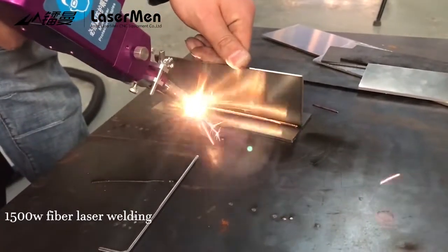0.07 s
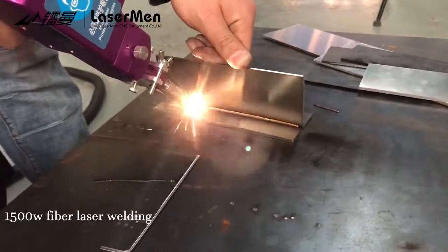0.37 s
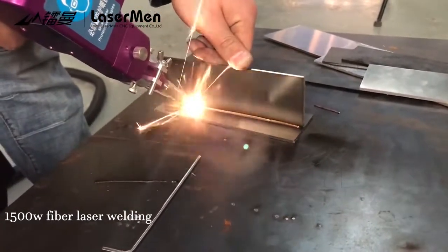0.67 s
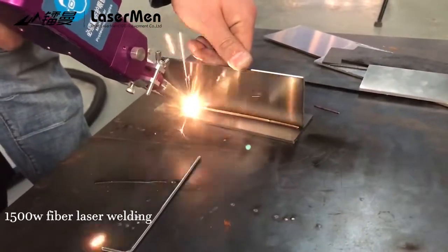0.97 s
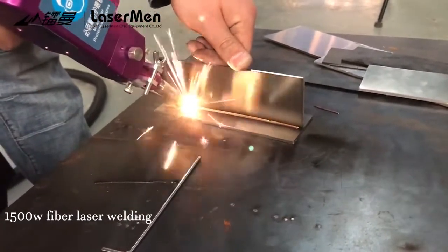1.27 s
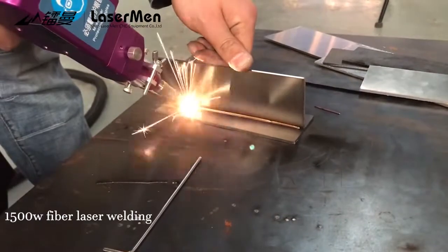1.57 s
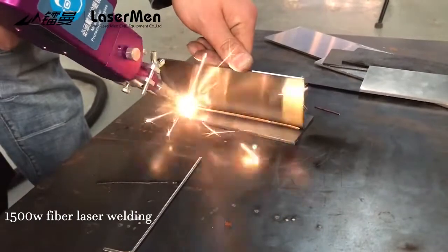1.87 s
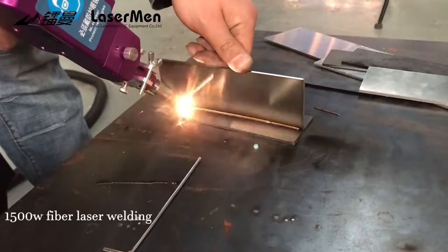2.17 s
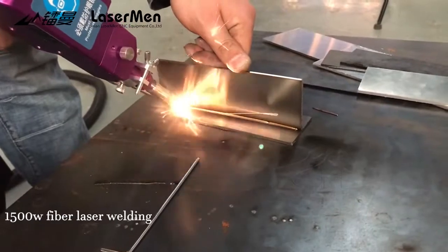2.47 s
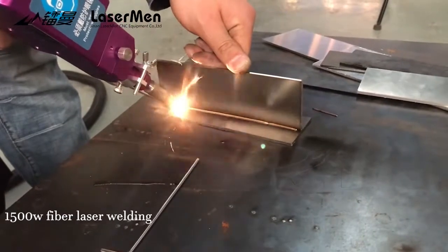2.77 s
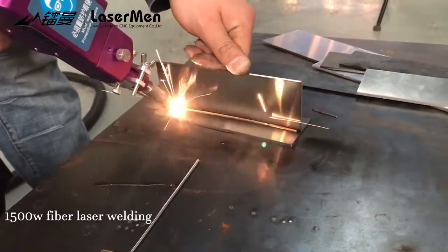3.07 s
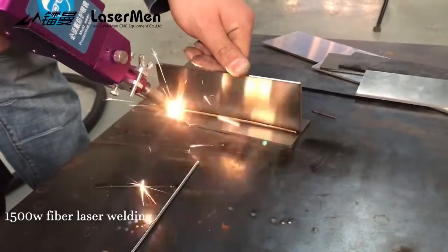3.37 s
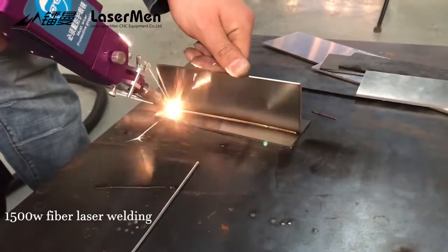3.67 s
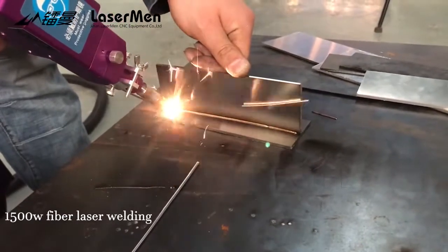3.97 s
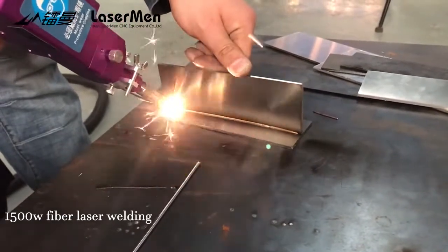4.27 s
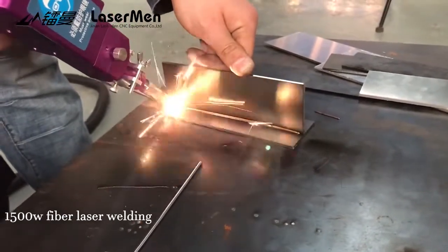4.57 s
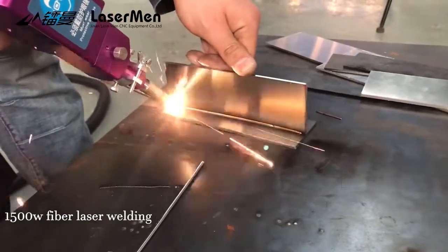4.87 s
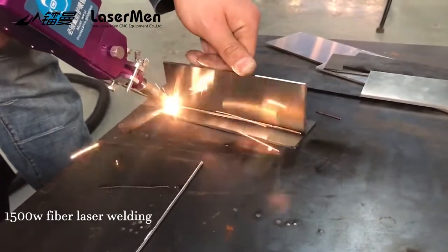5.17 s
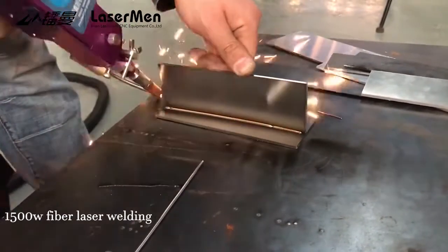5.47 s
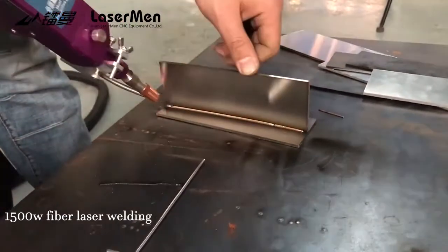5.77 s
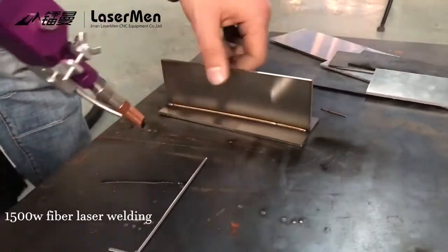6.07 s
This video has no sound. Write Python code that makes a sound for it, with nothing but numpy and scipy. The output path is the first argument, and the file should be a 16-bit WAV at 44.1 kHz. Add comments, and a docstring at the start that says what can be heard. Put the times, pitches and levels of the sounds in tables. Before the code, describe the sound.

A laser welder sizzles and crackles steadily on steel, then stops, leaving a weaker gas hiss and a light metal scrape.

```python
"""Handheld laser welding on a workbench

A laser welder runs along the corner of two steel sheets, close up. The melt sizzles and surges with
each push of the filler wire, over shielding gas hissing through the nozzle. The beam stops, the melt
spits a few more times, the gas shuts off and the piece is nudged across the bench; machines hum."""
import sys
import numpy as np
from scipy import signal
from scipy.fft import rfft, irfft
from scipy.io import wavfile
from scipy.ndimage import uniform_filter1d

SR = 44100
rng = np.random.default_rng(int(sys.argv[2]) if len(sys.argv) > 2 else 0)


def persist_wave(psi):
    """Save psi, clipped to +-1, as 16-bit WAV."""
    counts = np.round(np.clip(psi, -1, 1) * 32767).astype(np.int16)
    wavfile.write(sys.argv[1], SR, np.atleast_2d(counts).T)


N = 278712
TIME = np.arange(N) / SR
FREQ = np.maximum(np.arange(N // 2 + 1) * SR / N, 1)
FEED_HZ = 9.757  # pushes of the filler wire
BEAM_OFF_S = 5.283


def from_db(db):
    """Decibels to gain."""
    return 10 ** (np.asarray(db) / 20)


def rms_one(x):
    """Scale to an rms of 1."""
    return x / np.sqrt(np.mean(x ** 2) + 1e-20)


def spectrum(points):
    """EQ curve through (frequency [Hz], gain [dB]) points."""
    hz, db = np.transpose(points)
    return from_db(np.interp(np.log(FREQ), np.log(hz), db))


def resonances(modes):
    """EQ curve of steep-sided peaks, each (frequency [Hz], width [Hz], gain [dB])."""
    peaks = (from_db(db) / (1 + ((FREQ ** 2 - hz ** 2) / (FREQ * width)) ** 2)
             for hz, width, db in modes)
    return np.sqrt(sum(peak ** 2 for peak in peaks))


def shaped(x, gain):
    """Filter by an EQ curve; rms 1."""
    return rms_one(irfft(rfft(x) * gain, N))


def noise():
    """White noise."""
    return rng.standard_normal(N)


def drift(rate_hz):
    """Smooth random wander; rms 1."""
    return shaped(noise(), 1 / (1 + (FREQ / rate_hz) ** 2))


def grains(per_s, spread_db):
    """Random clicks of uneven size and sign; rms 1."""
    sizes = from_db(spread_db * np.minimum(rng.exponential(1, N), 4))
    signs = rng.choice([-1, 1], N)
    return rms_one(sizes * signs * (rng.random(N) < per_s / SR))


def swell(centre_s, half_s):
    """Bell-shaped envelope of height 1."""
    return np.exp(-.5 * ((TIME - centre_s) / half_s) ** 2)


def ramp(start_s, end_s):
    """Rise evenly from 0 to 1 between two times."""
    return np.interp(TIME, [start_s, end_s], [0, 1])


def gate(at, start, end, edge):
    """1 between start and end, with rounded edges."""
    return (1 + np.tanh((at - start) / edge)) * (1 + np.tanh((end - at) / edge)) / 4


def burst(start_s, end_s, start_db, end_db, edge_s):
    """Envelope of a spurt or a stroke, which opens, grows and closes."""
    level_db = np.interp(TIME, [start_s, end_s], [start_db, end_db])
    return gate(TIME, start_s, end_s, edge_s) * from_db(level_db)


def room(x, t60_s, wet_db, first_echo_s=.0035):
    """Dense echoes from the bench and the things around it, duller than the direct sound."""
    tail = noise() * (TIME > first_echo_s) * from_db(-60 * np.minimum(TIME / t60_s, 2))
    tail = shaped(tail, spectrum([(3000, 4.5), (15000, 1)]))[:SR // 2] / np.sqrt(N)
    return from_db(wet_db) * signal.fftconvolve(x, tail)[:N]


def workshop(air_db=-46.2, air_duck_db=-5.0, sink_db_per_s=1.35, return_s=.2,
             hum_trim_db=-2.0, hum_duck_db=-2.5, waver_radians=.35):
    """Fans, and the wavering hum of the laser's power supply and cooler; both duck under the weld."""
    # room tone of the fans: (frequency [Hz], gain [dB])
    air_eq = [(30, -12.5), (50, -2.5), (100, -3), (200, -4), (300, -9.5), (450, -14.5), (900, -12),
              (1300, -15.5), (2000, -21.5), (3700, -24.5), (5000, -32), (8000, -39.5), (15000, -46.5)]
    # partials of the machine hum: (frequency [Hz], relative level [dB])
    partials = [(100, -56), (199.5, -59), (300, -64), (400, -66), (802, -65), (899, -60.5), (980, -66.5)]
    welding = 1 - ramp(BEAM_OFF_S, BEAM_OFF_S + return_s)
    air_gain = from_db(air_db + welding * (air_duck_db - sink_db_per_s * TIME))
    air = shaped(noise(), spectrum(air_eq))
    hum_gain = np.sqrt(2) * from_db(hum_trim_db + hum_duck_db * welding)
    hum = sum(from_db(db) * np.sin(2 * np.pi * hz * TIME + waver_radians * drift(rate_hz=3.7))
              for hz, db in partials)
    return air_gain * air + hum_gain * hum


def wire_drive(uneven_db=2.2, start_db=2.3, fade_db_per_s=1.25, idle_db=-7.5):
    """Each push of the wire jolts the torch twice; the feed motor drones roughly underneath."""
    # low thumps: (place in the feed cycle [0-1], pitch [Hz], relative level [dB], t60 [s])
    jolts = [(.42, 88, -40.5, 0.054), (0.631, 50, -38.5, 0.11)]
    drive = from_db(-53.5) * shaped(noise(), resonances([(92.4, 21, 0), (223, 64, -11)]))  # motor
    for place, hz, db, t60_s in jolts:
        cycle, phase = np.divmod(TIME * FEED_HZ + 1 - place, 1)
        age = phase / FEED_HZ
        strength_db = db + uneven_db * rng.standard_normal(size=80)[cycle.astype(int)]
        drive += from_db(strength_db - 60 * age / t60_s) * np.sin(2 * np.pi * hz * age)
    fader_db = np.where(TIME < BEAM_OFF_S, start_db - fade_db_per_s * TIME, idle_db)
    return drive * from_db(uniform_filter1d(fader_db, size=SR // 4))


def handling(tap_at_s=6.207, tap_db=-46, tap_decay_s=.0088, ring_db=-7.5):
    """A soft rustle, later dull knocks of torch and hand; the sheet is tapped and slides in tiny slips."""
    # a soft low rustle early on, then dull knocks: (time [s], level [dB], pitch [Hz], half length [s])
    contacts = [(0.55, -51.5, 250, .07), (4.352, -42, 580, .007), (4.374, -49.5, 180, .02),
                (5.305, -40, 1010, 0.012), (5.37, -42, 463, 0.023), (5.376, -44.5, 188, 0.028),
                (6.017, -47, 300, 0.016), (6.1, -38.8, 895, .0025)]
    # ring of the steel sheet: (frequency [Hz], width [Hz], gain [dB])
    sheet_modes = [(1800, 150, -8), (3280, 130, -3), (4400, 200, -15), (6300, 200, -14), (8240, 460, -19)]
    # steel rubbing on the bench: (frequency [Hz], gain [dB])
    rub_eq = [(60, -16), (120, -8), (600, 1), (1000, -10), (1900, -8), (3300, -12), (4200, -18),
              (7000, -21), (10000, -30), (15000, -28)]
    # the slide, pressed harder as it goes: (start [s], end [s], start level [dB], end level [dB])
    stroke = (6.238, 6.325, -40, -37.5)
    touches = sum(from_db(db) * swell(at_s, half_s) * shaped(noise(), resonances([(hz, .87 * hz, 0)]))
                  for at_s, db, hz, half_s in contacts)
    slips = grains(per_s=6000, spread_db=1.0)
    ring = shaped(slips, resonances(sheet_modes))
    rub = shaped(slips, spectrum(rub_eq))
    age = TIME - tap_at_s
    tap = from_db(tap_db) * (age > 0) * np.exp(-np.abs(age) / tap_decay_s) * ring
    slide = burst(*stroke, edge_s=.007) * (rub + from_db(ring_db) * ring)
    return touches + tap + slide


def gas_flow(steady_db=-31.3, valve_shut_s=5.81, emptying_s=.125, trail_s=.014):
    """Level of the gas in dB: it holds until the valve shuts, then the hose empties and trails off."""
    puff_db = 4.0 * swell(centre_s=5.31, half_s=.015)  # the melt collapses
    clear_db = 3.0 * ramp(start_s=5.5, end_s=5.63)  # the nozzle comes clear of the work
    left_s = trail_s * np.logaddexp(0, (valve_shut_s + emptying_s - TIME) / trail_s)
    pressure = np.clip(left_s / emptying_s, 1e-3, 1)
    return steady_db + puff_db + clear_db + 20 * np.log10(pressure)


def gas(lift_s=(5.67, 5.72), jet_db=-9.0, flicker_db=1.0,
        crossover_hz=4500, full_flow_db=-27.5, dulling=.5):
    """Turbulent gas rings the nozzle's air column, with a little open jet noise; weak flow is duller."""
    # air column: (frequency [Hz], width [Hz], gain close to the sheet [dB], gain lifted off it [dB])
    nozzle_modes = [(2100, 290, -2, 1), (3290, 400, -3.5, -0.5), (4050, 600, -14, -12),
                    (4640, 360, 0.5, -4), (6070, 360, 0, -4), (7070, 480, -1, -1.5),
                    (8260, 380, -5.5, -9.5), (10040, 450, -12, -12.5), (11970, 1050, -10, -6.5),
                    (14220, 1100, -11.5, -10.5)]
    hz, width, close_db, lifted_db = np.transpose(nozzle_modes)
    turbulence, lift = noise(), ramp(*lift_s)
    close = shaped(turbulence, resonances(zip(hz, width, close_db)))
    lifted = shaped(turbulence, resonances(zip(hz, width, lifted_db)))
    jet = shaped(noise(), spectrum([(500, -18.5), (2500, 0), (8000, 0), (15000, -5)]))
    hiss = (1 - lift) * close + lift * lifted + from_db(jet_db) * jet
    body = irfft(rfft(hiss) / (1 + (FREQ / crossover_hz) ** 4), N)
    flow_db = gas_flow()
    treble = from_db(dulling * np.minimum(flow_db - full_flow_db, 0)) * (hiss - body)
    return from_db(flow_db - flicker_db * drift(rate_hz=32)) * (body + treble)


def wire_surge(push_db=1.3, slack_db=-1.2):
    """Swing of the sizzle in dB: in each feed cycle the wire dips into the melt, then hangs slack."""
    phase = TIME * FEED_HZ % 1
    push = gate(phase, start=.385, end=.6, edge=.025)
    slack = gate(phase, start=.6, end=.8, edge=.025)
    return push_db * push + slack_db * slack


def melt(sizzle_db=-18.45, crackle_db=-4.0, flicker_db=.55, flutter_db=.2, die_away_s=.022):
    """Boiling steel: a vapour jet full of tiny bursts, surging with the wire, spitting as it cools."""
    # tone of the sizzle: (frequency [Hz], gain [dB])
    sizzle_eq = [(150, -34), (400, -27.0), (700, -20.5), (980, -19.5), (1200, -12.5), (1600, -10.0),
                 (2000, -3.0), (2600, -3.5), (3800, 0.0), (7000, -1.5), (9800, -4.5), (11000, -10.0),
                 (14000, -6.5), (15700, -8.5)]
    # peaks and notches from reflections between nozzle and sheets:
    # (frequency [Hz], width [Hz], gain at mid-seam [dB], change from start to end [dB])
    corner_bands = [(2070, 220, 5.8, -.5), (2160, 2980, -1.9, -3.3), (3220, 280, 5.0, .5),
                    (4550, 260, 2.2, -2.2), (4840, 340, -7.2, -5), (5920, 200, 5.3, 0),
                    (6160, 270, -4.2, -2), (6980, 500, 5.2, 2.5), (7830, 320, .8, 7),
                    (8350, 400, -5.6, -.5), (8750, 400, 2, 1), (9480, 1100, 3.2, 2),
                    (10230, 260, -13.5, -21), (11040, 500, 4.6, 1.5), (11510, 260, -5.5, 3.5),
                    (12030, 390, 3.5, 3), (13180, 630, 5, -5), (14150, 260, 3.3, -1)]
    # last spits of the cooling melt: (start [s], end [s], start level [dB], end level [dB])
    last_spits = [(5.365, 5.389, -25.5, -23), (5.401, 5.43, -28, -27), (5.443, 5.47, -31, -29),
                  (5.468, 5.502, -22.5, -17.5)]
    boil = noise() + from_db(crackle_db) * grains(per_s=5000, spread_db=-.5)
    boil *= from_db(flutter_db * drift(rate_hz=430))
    # the reflections shift as the torch travels along the seam
    corner_db, shift_db = sum(np.outer(gains_db, 2 ** -((2 * (FREQ - hz) / width) ** 2))
                              for hz, width, *gains_db in corner_bands)
    colour = spectrum(sizzle_eq) * from_db(corner_db)
    seam_start = shaped(boil, colour * from_db(-shift_db / 2))
    seam_end = shaped(boil, colour * from_db(shift_db / 2))
    travel = ramp(0, BEAM_OFF_S)
    sizzle = (1 - travel) * seam_start + travel * seam_end
    sag_db = 1.5 * ramp(start_s=4.95, end_s=5.28)  # the torch runs out of seam
    level_db = sizzle_db - sag_db + wire_surge() + flicker_db * drift(rate_hz=21)
    release = np.exp(-np.maximum(TIME - BEAM_OFF_S, 0) / die_away_s)
    # the spits are thinner and brighter than the full melt
    spit_eq = spectrum([(500, 5), (1300, 6), (2200, -8), (6000, .5), (10000, .5), (12000, 5.5)])
    spits = sum(burst(*spit, edge_s=.003) for spit in last_spits) * shaped(boil, colour * spit_eq)
    return from_db(level_db) * release * sizzle + spits


def scene():
    """The work sounds close and nearly dry; one microphone feeds both channels."""
    work = melt() + gas() + handling()
    echoes = room(work, t60_s=.2, wet_db=-21)
    mono = work + echoes + wire_drive() + workshop()
    return np.array([mono, mono])


def record(dry, low_cut_hz=30, high_cut_hz=15680):
    """The microphone drops the deepest bass, and the top is cut steeply."""
    low_cut = signal.butter(2, low_cut_hz, "high", fs=SR, output="sos")
    high_cut = signal.ellip(12, .1, 90, high_cut_hz, fs=SR, output="sos")
    return signal.sosfilt(high_cut, signal.sosfilt(low_cut, dry))


dry = scene()
out = record(dry)
persist_wave(out)
```